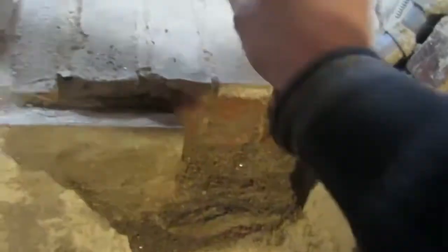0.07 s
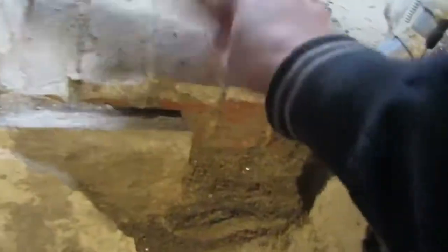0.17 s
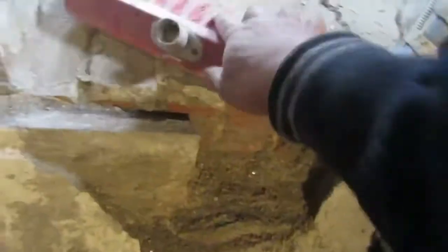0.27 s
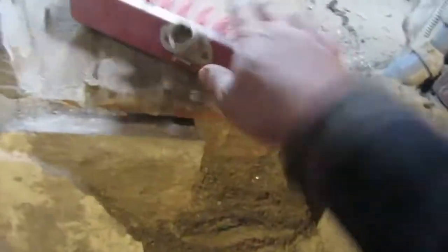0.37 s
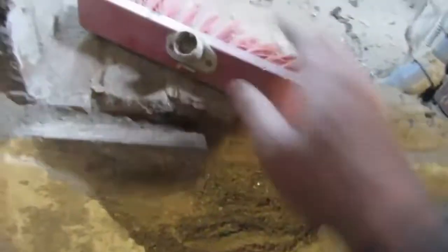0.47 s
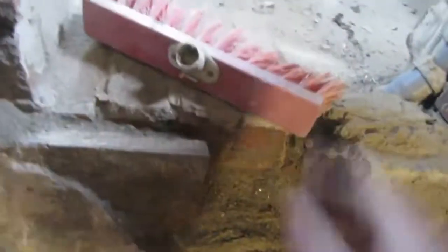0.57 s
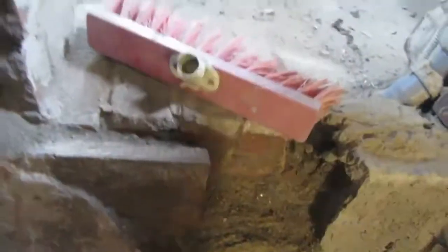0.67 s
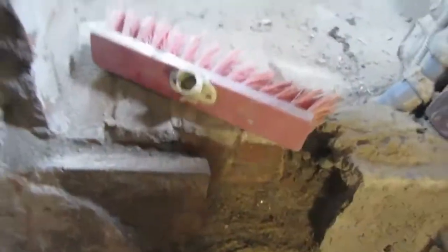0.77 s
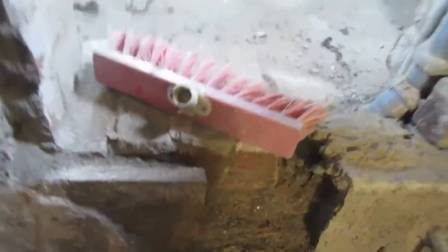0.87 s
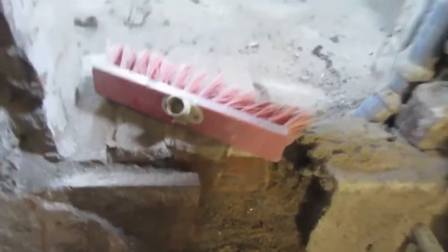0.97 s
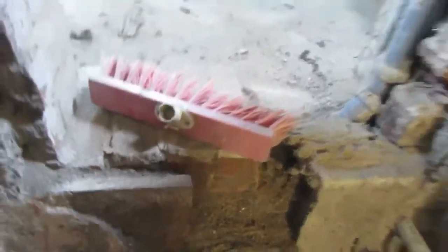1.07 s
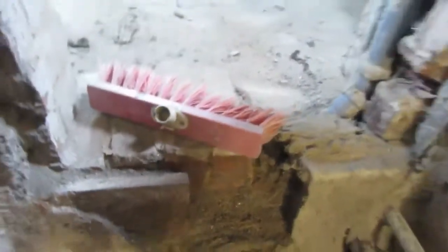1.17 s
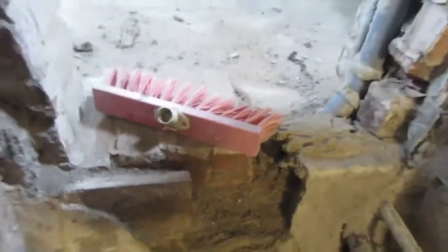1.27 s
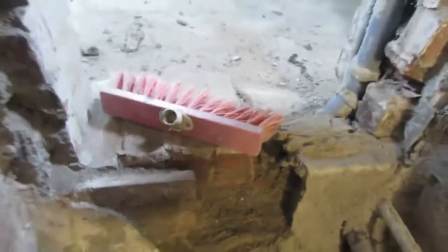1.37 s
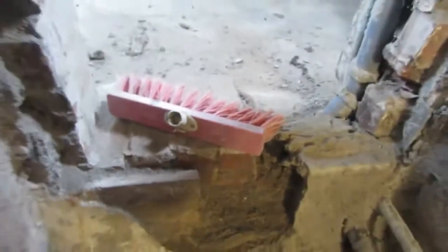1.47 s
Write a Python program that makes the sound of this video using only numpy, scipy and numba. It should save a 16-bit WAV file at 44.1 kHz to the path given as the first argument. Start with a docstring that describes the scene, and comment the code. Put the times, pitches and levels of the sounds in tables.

```python
"""Plastic brush on gritty masonry

Stiff bristles skid over grit in a train of tiny impacts, flick free, and splay in a swish as the head
knocks down. The head rings in damped modes, bounces and settles in a small, reverberant stone room.
The knock overloads the microphone and ducks its gain. Afterwards a sleeve rustles faintly, a few soft
thuds follow, and the bristles touch the stone again."""
import sys
import numpy as np
from scipy import signal
from scipy.fft import rfft, irfft
from scipy.io import wavfile
from numba import njit

SR = 44100
rng = np.random.default_rng(int(sys.argv[2]) if len(sys.argv) > 2 else 0)


def digitize_waveform(pressure):
    """Quantize a signal to 16-bit integers and store it at the path in sys.argv[1].

    Rows of a 2-D input are taken as channels; values are limited to [-1, 1].
    """
    field = np.atleast_2d(pressure).T
    bounded = np.clip(field, -1, 1)
    quanta = np.round(bounded * 32767).astype(np.int16)
    wavfile.write(sys.argv[1], SR, quanta)


N = 66150

# spectrum of the still air in the room (f/Hz, level/dB)
AIR_SPECTRUM = [(25, 3), (55, -5), (88, 5), (115, -1), (155, 2.5), (400, -1), (1200, -4), (4000, -14),
                (9000, -19.5), (15000, -31)]
# envelope of the sleeve rustle (t/s, level/dB)
SLEEVE_ENVELOPE = [(.45, -82), (.62, -62), (.74, -61.5), (.9, -69.5), (1.02, -59), (1.2, -70.5),
                   (1.3, -65.5), (1.36, -58), (1.5, -57.5)]
# spectrum of the sleeve rustle (f/Hz, level/dB)
SLEEVE_SPECTRUM = [(60, -21.5), (200, -2), (500, -4.5), (900, -2), (1750, -3), (2200, -12.5), (6000, -22),
                   (15000, -38.5)]
# a low handling rumble at the start, then soft thuds after the knock (t/s, level/dB, f/Hz)
LOW_THUDS = [(.01, -47.5, 87.5), (0.726, -51.5, 150), (0.799, -47.5, 153.9), (1.215, -44, 153.3),
             (1.275, -50.5, 150.4)]
# reverberation bands of the stone room (f/Hz, level/dB, T60/s)
ROOM_BANDS = [(78, -9, 0.6), (160, 1.5, .48), (350, -2, 0.38), (600, -9.5, .33), (1220, -12, 0.26),
              (2100, -9.5, 0.16), (3400, -23, .2), (9000, -20.5, 0.24), (15130, -22.5, .12)]
# envelope of the bristles dragging over the stone (t/s, level/dB)
DRAG_ENVELOPE = [(0, -46), (.03, -41), (.075, -46.5), (.1, -42.5), (.15, -45), (.185, -41), (.208, -47),
                 (.222, -41), (.25, -42), (.3, -43), (.35, -51), (.42, -54), (.46, -63), (.52, -89),
                 (1.478, -75), (1.488, -51)]
# spectrum of the drag (f/Hz, level/dB)
DRAG_SPECTRUM = [(60, -4), (150, -0.5), (300, -9.5), (700, -0.5), (1800, -1.5), (3200, -1), (6000, -7.5),
                 (9000, -10), (15000, -22)]
# spectrum of the splaying bristles (f/Hz, level/dB)
SPLAY_SPECTRUM = [(100, -35), (300, -11.5), (700, -9), (1600, -5), (3000, -1), (4500, -4), (7000, -1.5),
                  (10000, -5.5), (15000, -22)]
# tufts that catch on the grit and flick free (t/s, level/dB, centre f/Hz, scratch time constant/s)
TUFT_FLICKS = [(0.026, -39, 6400, 0.0027), (.039, -34, 3530, 0.0024), (.056, -38.5, 4250, 0.00067),
               (.0918, -31.5, 4260, 0.0037), (0.1122, -35, 5200, .005), (0.1261, -32, 4707, 0.0018),
               (.157, -37.5, 3520, 0.0032), (0.1662, -29.5, 2052, .002), (.1715, -35, 1500, .005),
               (0.1819, -28.5, 4800, .002), (0.19, -32, 6000, .005)]
# bristles that spring back afterwards (t/s, level/dB, centre f/Hz, scratch time constant/s)
SPRING_BACKS = [(.3805, -44.5, 6130, 0.0024), (.423, -50, 4000, 0.0022), (0.431, -52, 4870, 0.0022),
                (.499, -62, 4040, 0.0092)]
# normal modes of the brush head (f/Hz, level/dB, T60/s)
HEAD_MODES = [(152.96, -31.5, 0.054), (349, -14, 0.035), (511, -13.5, 0.028), (729, -10, 0.022),
              (867, -13.5, 0.031), (1260, -4, 0.012), (1510, -5, 0.01), (1950, -7, 0.0095),
              (2237, -12, 0.013), (2870, -5, 0.0083), (4200, -10, 0.0072), (6790, -12, 0.011),
              (8570, -10, 0.0087), (9730, -7.5, 0.012)]
# contacts of the head; on the bounce its edges land just apart (t/s, level/dB, cutoff f/Hz)
HEAD_CONTACTS = [(0.2496, 10.5, 7000), (0.3147, -10, 2900), (0.3157, -11.5, 2907), (0.3188, -5, 860),
                 (0.385, -20.5, 890)]

DRAG_GRAINS_PER_S, SPLAY_GRAINS_PER_S, GRAIN_SPREAD_DB = 8000, 23000, 3.0
TOP_HZ = 14950
TIME = np.arange(N) / SR
LOG_FREQ = np.log(np.maximum(np.fft.rfftfreq(N, 1 / SR), 1))
LN_1000 = np.log(1000)  # time constants in a 60 dB decay


def undb(db):
    """Amplitude ratio of a level in decibels."""
    return 10 ** (np.asarray(db) / 20)


def envelope(points):
    """Amplitude over time, interpolated in level between (t/s, level/dB) points."""
    return undb(np.interp(TIME, *np.array(points).T))


def unit_rms(x):
    """Normalisation to unit mean power."""
    return x / np.sqrt(np.mean(x ** 2))


def colour(x, spectrum):
    """Spectral shaping by (f/Hz, level/dB) points, at unit mean power."""
    hz, db = np.array(spectrum).T
    gain = undb(np.interp(LOG_FREQ, np.log(hz), db))
    return unit_rms(irfft(rfft(x) * gain, N))


def butterworth(x, hz, kind="low", order=2):
    """Filtering with a maximally flat passband."""
    return signal.sosfilt(signal.butter(order, hz, kind, fs=SR, output="sos"), x)


def resonate(x, hz, width=.8):
    """Second-order resonance; width is the relative bandwidth, 1/Q."""
    g = np.tan(np.pi * hz / SR)
    damping = g * width
    feedback = [1 + damping + g * g, 2 * (g * g - 1), 1 - damping + g * g]
    return signal.lfilter([damping, 0, -damping], feedback, x)


def decay(start, tau):
    """Exponential decay from a sudden onset, with time constant tau."""
    age = TIME - start
    return (age >= 0) * np.exp(-np.maximum(age, 0) / tau)


def delayed(x, seconds):
    """Pure time delay."""
    return np.concatenate([np.zeros(int(seconds * SR)), x])[:N]


def air(level_db=-59):
    """Stationary noise, strongest at low frequencies: the still air of the room."""
    return undb(level_db) * colour(rng.standard_normal(N), AIR_SPECTRUM)


def sleeve():
    """Friction of cloth gives broadband noise with a slowly varying amplitude."""
    return envelope(SLEEVE_ENVELOPE) * colour(rng.standard_normal(N), SLEEVE_SPECTRUM)


def thuds(t60_s=.18, rise_s=.003):
    """Damped low-frequency oscillations: a handling rumble at the start, soft thuds after the knock."""
    shape = decay(0, t60_s / LN_1000) * (1 - decay(0, rise_s))
    return sum(undb(db) * delayed(shape * np.sin(2 * np.pi * hz * TIME), start)
               for start, db, hz in LOW_THUDS)


def room(x, delay_s=.003, build_s=.0013, scatter_s=.0022):
    """Convolution with early scatter from nearby stones and a diffuse tail whose lows last longest."""
    hz, db, t60 = np.array(ROOM_BANDS).T
    noise = rfft(rng.standard_normal(N))
    tail = np.zeros(N)
    for selector, gain, tau in zip(np.eye(len(hz)), undb(db), t60 / LN_1000):
        band = irfft(noise * np.interp(LOG_FREQ, np.log(hz), selector), N)
        tail += gain * band * decay(0, tau) * np.sqrt(2 / (tau * SR))  # energy independent of tau
    scatter = butterworth(rng.standard_normal(N), hz=2200) * decay(0, scatter_s)
    scatter *= undb(-9) * np.sqrt(2 / (scatter_s * SR))
    response = tail * (1 - decay(0, build_s)) + scatter
    return signal.fftconvolve(x, delayed(response, delay_s))[:N]


def grit(grains_per_s):
    """Shot noise: bristle tips strike sand grains at random, a few much harder than the rest."""
    hits = rng.random(N) < grains_per_s / SR
    size = undb(GRAIN_SPREAD_DB * np.minimum(rng.exponential(size=N), 5))
    return unit_rms(hits * size * rng.choice([-1, 1], N))


def drag():
    """Sliding friction on rough stone: many small impacts merge into a scratch."""
    return envelope(DRAG_ENVELOPE) * colour(grit(DRAG_GRAINS_PER_S), DRAG_SPECTRUM)


def splay(full_s=.232, landing_s=.251, peak_db=-27, rise_db_per_s=1199, fall_db_per_s=559):
    """Denser shot noise from splaying bristles swells into a swish and dies once the head lands."""
    rise_db = rise_db_per_s * np.minimum(TIME - full_s, 0)
    fall_db = fall_db_per_s * np.maximum(TIME - landing_s, 0)
    return undb(peak_db + rise_db - fall_db) * colour(grit(SPLAY_GRAINS_PER_S), SPLAY_SPECTRUM)


def flicks(snap_strength=5.7):
    """Stick and slip: each tuft snaps free and scratches on briefly, driving a broad resonance."""
    out, impulse = np.zeros(N), signal.unit_impulse(N)
    for start, db, hz, tau in TUFT_FLICKS + SPRING_BACKS:
        snap = snap_strength * delayed(impulse, start)
        scratch = grit(DRAG_GRAINS_PER_S) * decay(start, tau)
        response_norm = np.linalg.norm(resonate(impulse, hz))
        out += undb(db) * resonate(snap + scratch, hz) / response_norm
    return butterworth(out, hz=8700)


def head(crack_db=-13, crack_s=.001):
    """Impact on stone gives a crack and excites the plastic head's modes; softer contacts are duller."""
    ring = sum((-1) ** k * undb(db) * np.sin(2 * np.pi * hz * TIME) * decay(0, t60 / LN_1000)
               for k, (hz, db, t60) in enumerate(HEAD_MODES))
    out = np.zeros(N)
    for start, db, cutoff_hz in HEAD_CONTACTS:
        crack = undb(crack_db) * rng.standard_normal(N) * decay(0, crack_s)
        out += undb(db) * delayed(butterworth(ring + crack, cutoff_hz), start)
    return butterworth(out, hz=119, kind="high", order=4)  # a small body radiates little bass


def scene():
    """Superposition of the brush, its reverberation and the background, alike in both channels."""
    brush = drag() + splay() + flicks() + head()
    return np.tile(brush + room(brush) + thuds() + sleeve() + air(), (2, 1))


@njit
def follow(x, attack_s, release_s):
    """Envelope detection: rectification, then smoothing with separate rise and fall time constants."""
    out, level = np.empty(len(x)), 0.
    for i in range(len(x)):
        tau = attack_s if abs(x[i]) > level else release_s
        level += (abs(x[i]) - level) / (tau * SR)
        out[i] = level
    return out


def record(dry, threshold_db=-20, slope=.61, clip_level=.97):
    """Compression and overload: the knock ducks the gain and clips; a low-pass limits the bandwidth."""
    level = follow(np.clip(dry[0], -1, 1), attack_s=.0038, release_s=.32)
    gain = np.maximum(level / undb(threshold_db), 1) ** -slope
    clipped = np.clip(dry * gain, -clip_level, clip_level)
    return signal.sosfilt(signal.ellip(8, .2, 60, TOP_HZ, fs=SR, output="sos"), clipped)


dry = scene()
out = record(dry)
digitize_waveform(out)
```